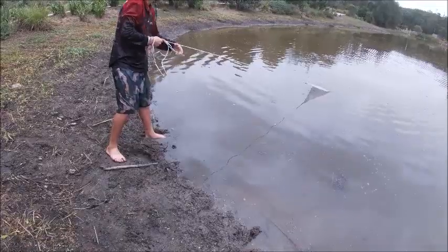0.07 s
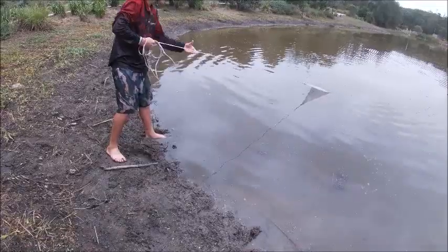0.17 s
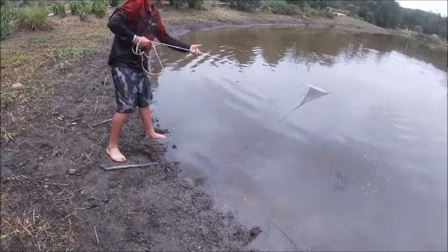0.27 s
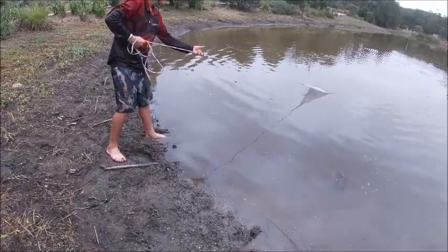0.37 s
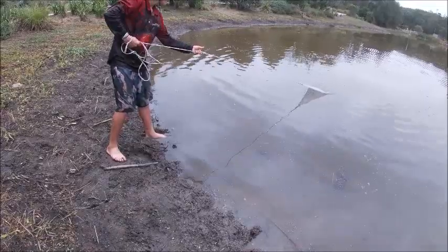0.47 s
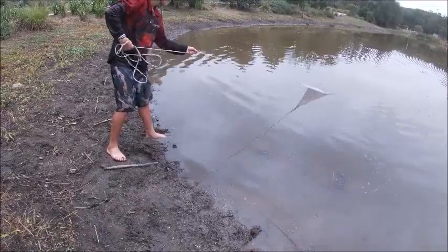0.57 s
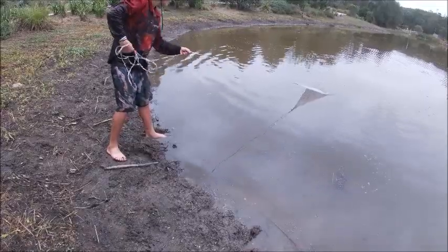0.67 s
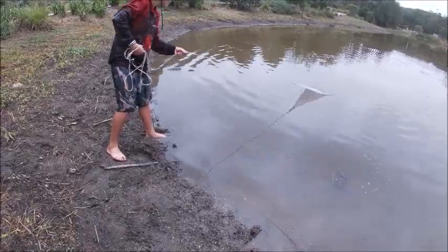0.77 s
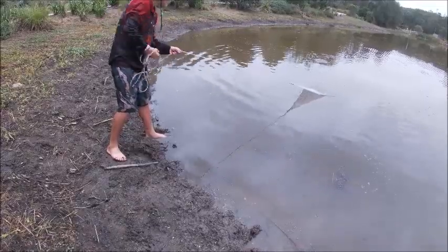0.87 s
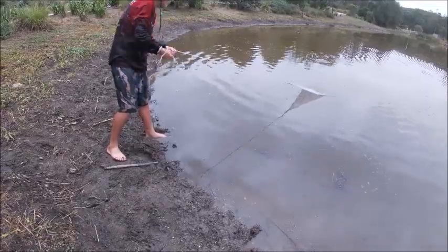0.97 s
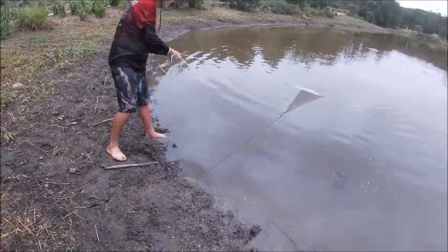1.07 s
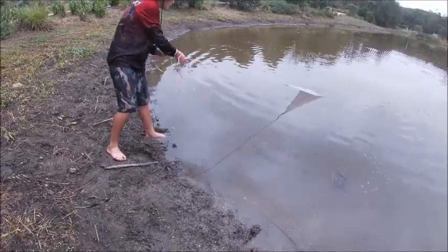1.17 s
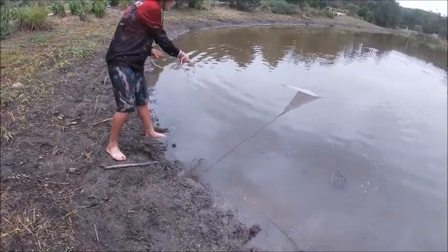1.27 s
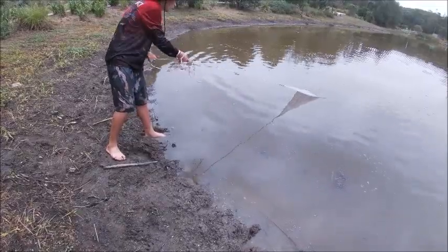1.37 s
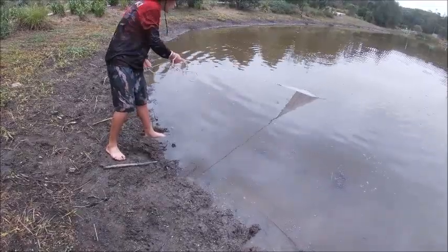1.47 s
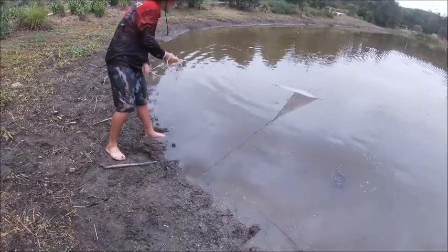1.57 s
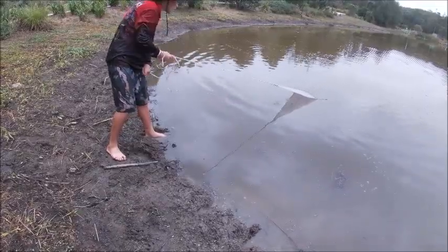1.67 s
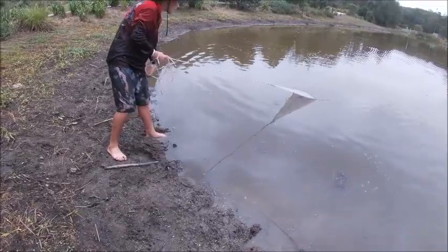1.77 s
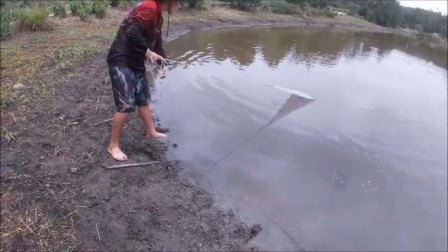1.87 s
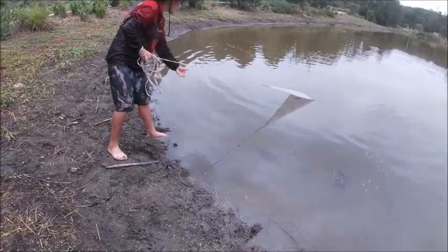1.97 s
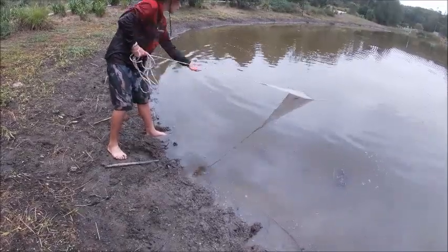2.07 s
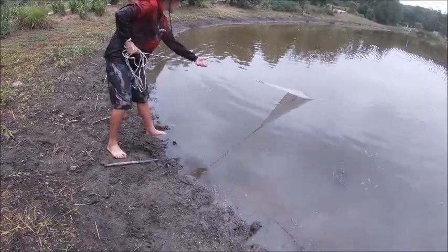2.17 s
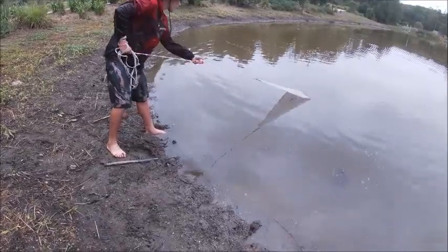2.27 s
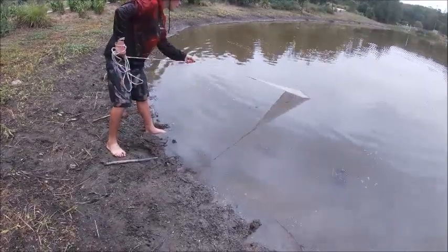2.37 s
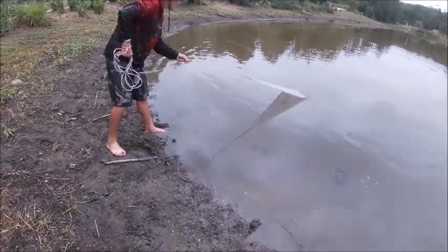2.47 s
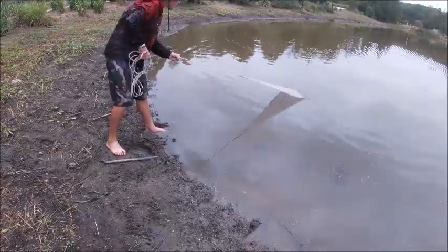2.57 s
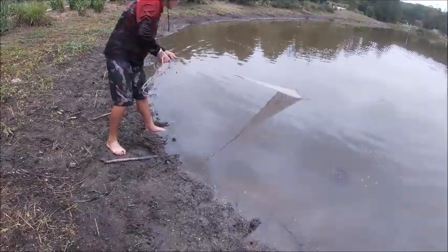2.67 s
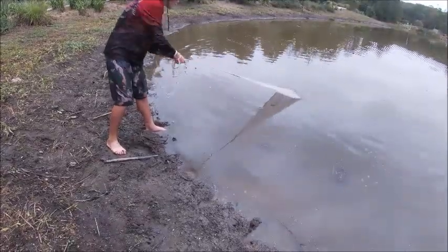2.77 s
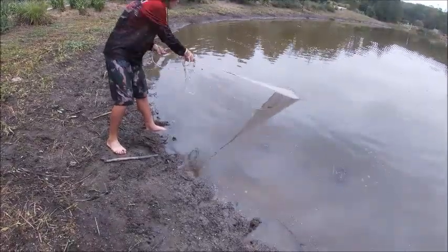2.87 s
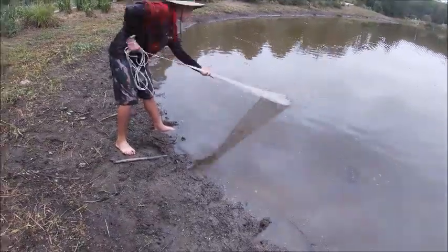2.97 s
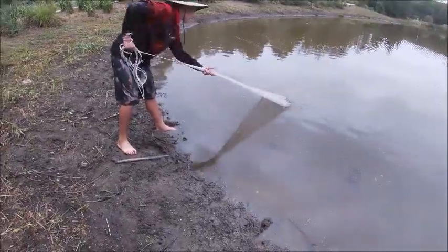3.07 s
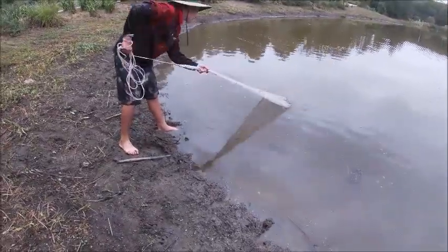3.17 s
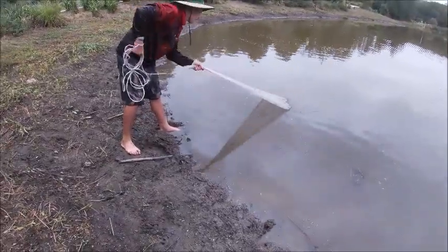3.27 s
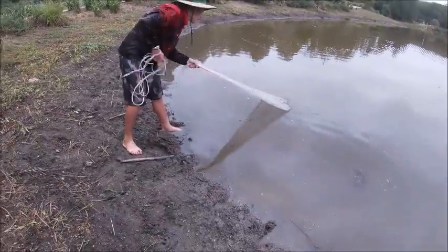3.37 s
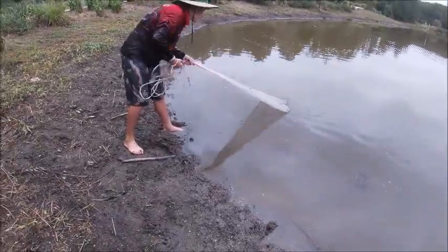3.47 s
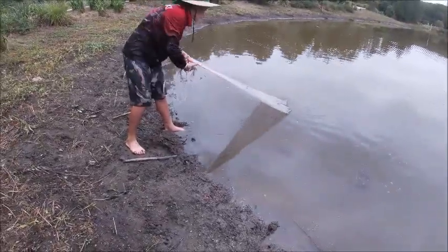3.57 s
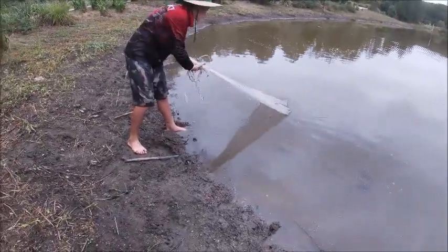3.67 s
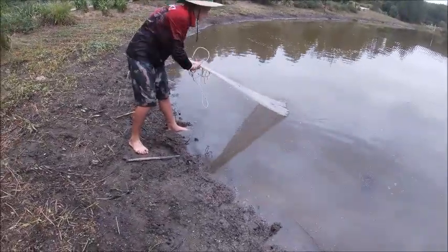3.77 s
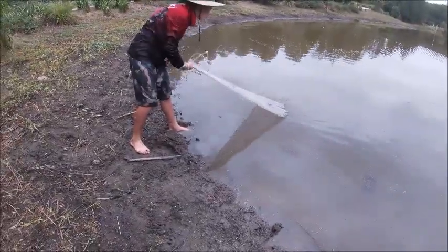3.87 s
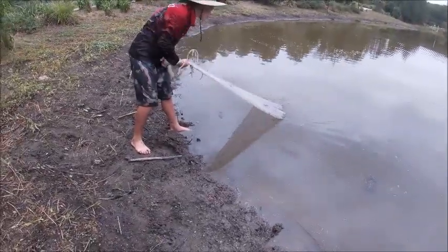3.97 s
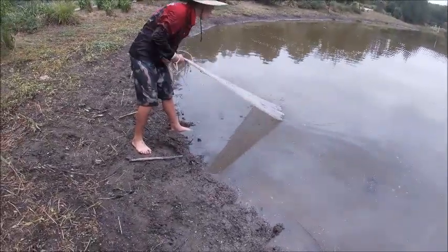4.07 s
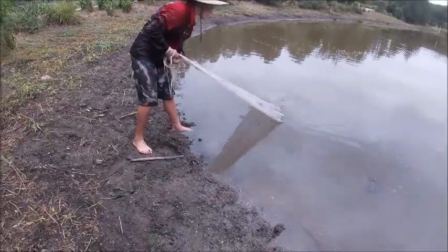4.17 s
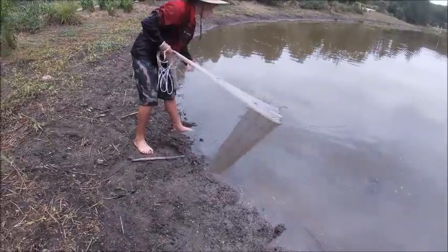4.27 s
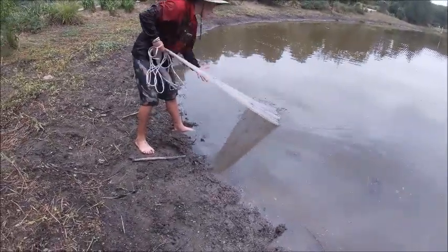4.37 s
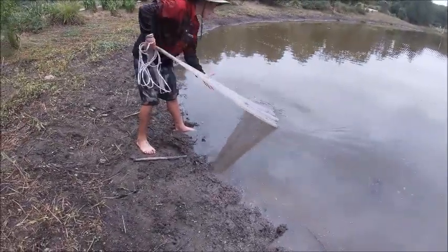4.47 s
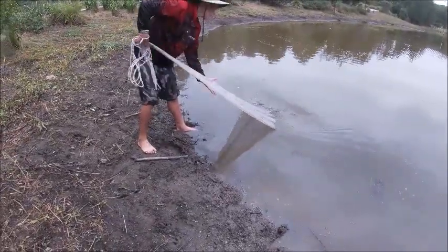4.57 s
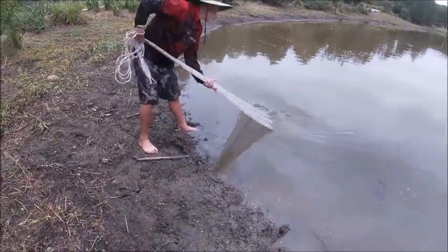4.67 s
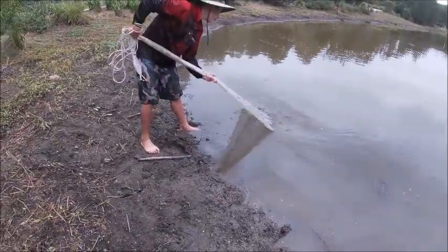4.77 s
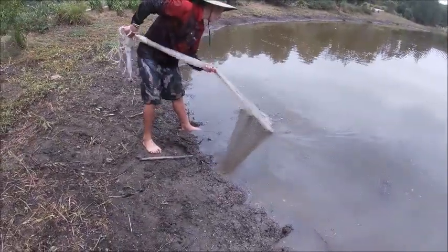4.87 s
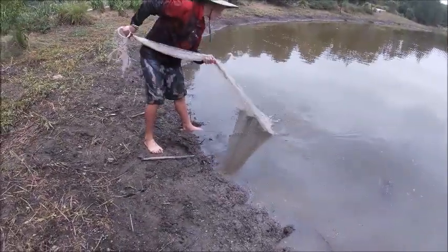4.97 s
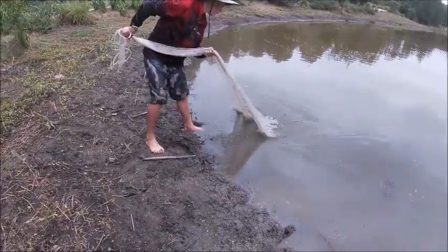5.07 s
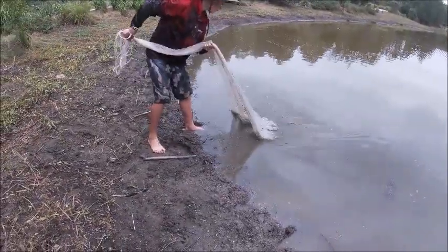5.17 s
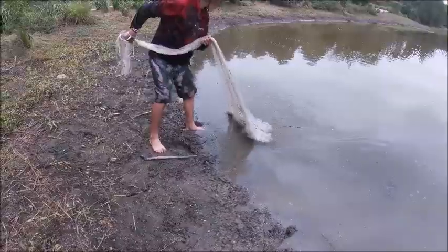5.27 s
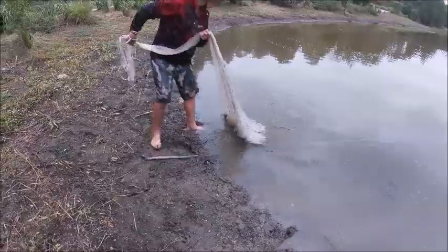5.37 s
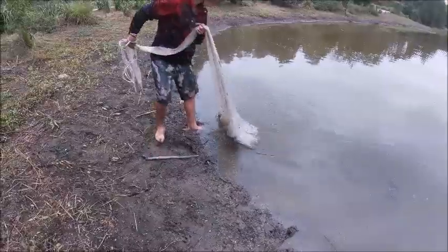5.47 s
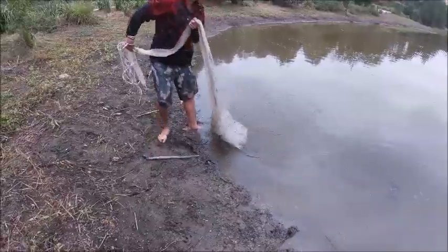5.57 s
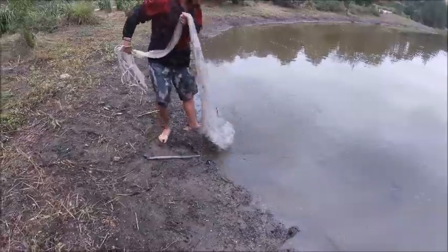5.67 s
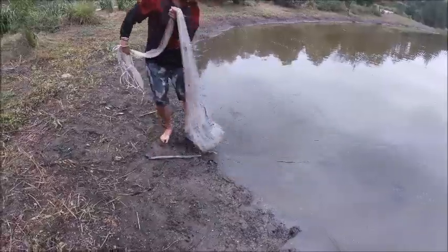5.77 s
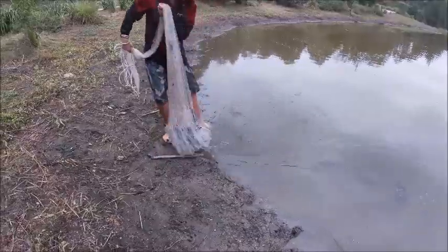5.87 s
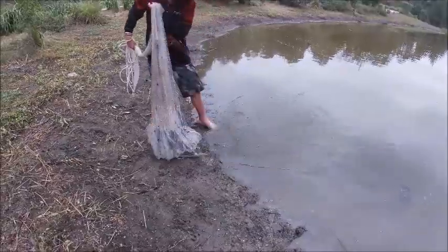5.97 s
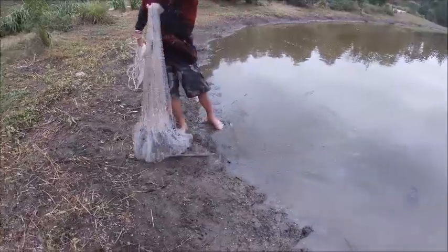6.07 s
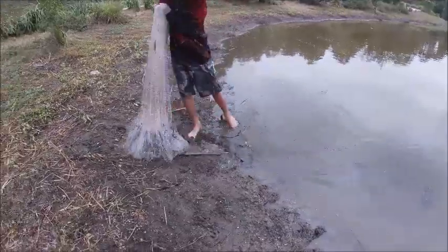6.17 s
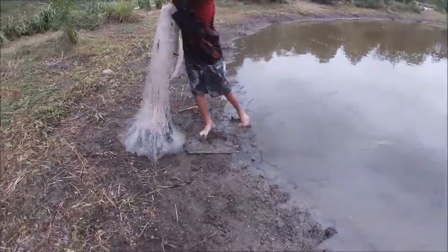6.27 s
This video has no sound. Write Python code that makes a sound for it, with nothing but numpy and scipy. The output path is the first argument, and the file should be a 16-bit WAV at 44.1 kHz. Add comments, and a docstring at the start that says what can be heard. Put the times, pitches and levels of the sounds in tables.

```python
"""A cast net is hauled in at a muddy pond, under a breeze that buffets the microphone and a far low hum that fades.
Wet rope rustles in clumps of friction grains while far birds twitter and whistle in gliding tones and an insect,
a pulsed narrow resonance, trills. Damped low knocks hit the mud, and a small bird chirps four times close by.
Bubbles gulp up with climbing pitch, fine drops hiss, and heavy drops smack and ring. At last the net lifts clear
and sheds its water in spurts, made of swarms of ringing bubbles and drop impacts."""
import sys
import numpy as np
from scipy import signal
from scipy.fft import rfft, irfft, next_fast_len
from scipy.io import wavfile
from scipy.ndimage import uniform_filter1d, map_coordinates

SR = 44100
rng = np.random.default_rng(int(sys.argv[2]) if len(sys.argv) > 2 else 0)


def write(x):
    x = np.atleast_2d(x).T
    wavfile.write(sys.argv[1], SR, np.round(np.clip(x, -1, 1) * 32767).astype(np.int16))

N = 278077


def amp(db):
    """Decibels to gain."""
    return 10 ** (np.asarray(db) / 20)


def unit(x):
    """Scale x to rms 1."""
    return x / np.sqrt(np.mean(x ** 2) + 1e-20)


def along(points, hz):
    """Read (Hz, value) points on a log frequency axis."""
    f, v = np.transpose(points)
    return np.interp(np.log(hz + 1), np.log(f + 1), v)


def curves(rows):
    """Draw one value per sample for each column after the time."""
    s, *columns = np.transpose(rows)
    t = np.arange(N) / SR
    return [np.interp(t, np.sort(s), column) for column in columns]


def wobble(rate):
    """A smooth random curve with rate knots a second."""
    knots = rng.standard_normal(int(N * rate / SR) + 4)
    fine = np.arange(len(knots) * 10) / 10
    smooth = map_coordinates(knots, [fine], mode="nearest")
    return np.interp(np.arange(N) * rate / SR, fine, smooth)


def filtered(x, response):
    """Multiply the spectrum of x by a response of frequency."""
    size = next_fast_len(N + SR // 2)
    hz = np.fft.rfftfreq(size, 1 / SR)
    return irfft(rfft(x, size) * response(hz), size)[:N]


def coloured(x, spectrum):
    """Shape x with a spectrum of (Hz, dB) points and bring it to rms 1."""
    return unit(filtered(x, lambda hz: amp(along(spectrum, hz))))


def noise(spectrum):
    """Noise of rms 1 with a spectrum."""
    return coloured(rng.standard_normal(N), spectrum)


def phase_of(hz):
    """Running phase of a pitch curve."""
    return 2 * np.pi * np.cumsum(hz) / SR


def add(track, s, sound):
    """Mix a sound into a track at s seconds."""
    part = track[max(round(s * SR), 0):][:len(sound)]
    part += sound[:len(part)]


def surges(rows):
    """Gain of overlapping surges that grow and fade exponentially, summed as powers."""
    t = np.arange(N) / SR
    power = 0
    for s, db, rise, fall in rows:
        distance = np.maximum((s - t) / rise, (t - s) / fall)
        power = power + (amp(db) * np.exp(-distance)) ** 2
    return np.sqrt(power)


def bubbles(count, low_hz, high_hz, cycles, spread_db, rise):
    """A steady swarm of bubbles; each rings some cycles while its pitch rises."""
    when, pitch, strength, life = rng.random((count, 4), dtype=np.float32).T[:, :, None]
    hz = low_hz * (high_hz / low_hz) ** pitch
    decay = cycles * (.5 + life) / hz
    index = np.arange(min(int(2 * cycles / low_hz * SR), SR // 40))
    t = index.astype(np.float32) / SR
    gain = amp(-spread_db * np.log(strength + .04)) * np.sqrt(hz / low_hz)
    envelope = (1 - np.exp(-t * hz)) * np.exp(-t / decay) * (1 - t / t[-1])
    bend = 1 + rise * np.tanh(t / decay / 2) / 2
    ring = gain * envelope * np.sin(2 * np.pi * hz * t * bend)
    position = (when * N).astype(int) + index
    return unit(np.bincount(position.ravel(), ring.ravel(), N)[:N])


def crackle(count, spread_db):
    """Scattered impulses, a few large among many small."""
    when, strength, sign = rng.random((count, 3)).T
    impulses = np.sign(sign - .5) * amp(-spread_db * np.log(strength + 0.037))
    return np.bincount((when * N).astype(int), impulses, N)


def banks(x, early_db, tail_db):
    """The ground answers within milliseconds; banks and trees add a thin long tail."""
    # Decay of the tail. Each row: frequency in Hz, t60 in seconds.
    tail_decay = [(300, 1), (3500, 0.63), (6000, 0.81), (10000, 0.53)]
    hz, t, z = signal.stft(rng.standard_normal(SR), SR, nperseg=256)
    fading = amp(-60 * t / along(tail_decay, hz)[:, None])
    tail = signal.istft(z * fading, SR, nperseg=256)[1]
    t = np.arange(len(tail)) / SR
    early = rng.standard_normal(len(t)) * amp(-60 * t / 0.12) * (t > .003)
    echo = amp(early_db) * early / np.linalg.norm(early)
    echo = echo + amp(tail_db) * tail / np.linalg.norm(tail)
    return x + signal.fftconvolve(x, echo)[:len(x)]


def breeze(air_db=-67.5):
    """Outdoor hush, a low rumble and slow wind buffets on the microphone, each as shaped noise."""
    # Colours of hush, wind and rumble. Each row: frequency in Hz, relative level in dB.
    air_colour = [(25, 5.5), (50, 0), (113, -10), (188, -3.5), (300, -10), (470, -21.5), (800, -12),
                  (1150, -17.5), (2840, -21), (3900, -26.5), (6800, -23.5), (9500, -38.5), (13200, -46.5),
                  (15500, -53)]
    buffet_colour = [(6, -8), (12, 8.5), (24, -7), (36, -5), (50, -14), (80, -33), (150, -52), (400, -51),
                     (1000, -110)]
    rumble_colour = [(50, -22.5), (85, -12), (118, -14.5), (160, 1.5), (205, -4), (270, -24.5), (450, -28),
                     (1000, -83)]
    # Wind gusts and rumble swells. Each row: peak in seconds, level in dB, rise and fall in seconds.
    gusts = [(2.02, -55, 0.032, 0.073), (3.27, -52.5, 0.087, 0.17), (4.6, -55.5, 0.071, 0.13),
             (4.78, -50.5, .02, .03), (4.9, -41, 0.046, 0.039), (5.22, -47.5, 0.12, 0.14),
             (5.7, -33.5, 0.064, 0.12), (6.31, -38.5, 0.14, 0.11)]
    swells = [(.03, -65.5, 0.033, 0.043), (1.2, -53.5, .02, 0.033), (1.35, -57.5, .04, 0.049),
              (1.72, -57.5, 0.027, 0.034), (2.3, -69, .3, .1), (4.57, -67.5, 0.069, 0.068),
              (6.05, -67, 0.4, 0.28)]
    calm_db, rumble_db, rumble_fade_db_per_s = -75.5, -69, 2.5  # floors between gusts and swells
    dip_s, dip_half_s, dip_db = 3.06, 0.02, -10  # the hush dips briefly
    t = np.arange(N) / SR
    dip = dip_db * np.exp(-((t - dip_s) / dip_half_s) ** 4)
    hush = amp(air_db + dip + 1.53 * wobble(4.405)) * noise(air_colour)
    buffets = np.hypot(amp(calm_db), surges(gusts)) * noise(buffet_colour)
    rumble_floor = amp(rumble_db - rumble_fade_db_per_s * t)
    rumble = np.hypot(rumble_floor, surges(swells)) * noise(rumble_colour)
    return hush + buffets + rumble


def hum(hum_hz=85, width_hz=7):
    """A faint low hum, noise through a narrow resonance, wavers and dies away."""
    # Each row: time in seconds, level in dB.
    hum_level = [(0, -69), (.85, -65.5), (1.0, -78), (1.6, -70.5), (2.2, -89)]
    tone = filtered(rng.standard_normal(N), lambda hz: 1 / (1 + ((hz - hum_hz) / width_hz) ** 2))
    return amp(curves(hum_level)[0]) * unit(tone)


def rope():
    """Each pull is a clump of friction grains, dull from the coils and hissing from the wet line."""
    # Wet rope drawn through the hands. Each row: loudest moment in seconds, level in dB,
    # spread of the bell-shaped swell in seconds, hiss share of the power (0-1).
    rustles = [(0.029, -58, 0.004, 0), (0.57, -73.5, 0.14, 0.7), (.868, -60, 0.0034, 0.17),
               (1.644, -60.5, 0.011, 0), (1.716, -59, 0.033, 0.14), (2.027, -51.5, 0.012, 0.06),
               (2.301, -63, .013, 0.16), (2.44, -68, 0.061, 0.96), (2.646, -65.5, .029, 0.98),
               (2.976, -68, 0.038, 0.42), (3.457, -66.5, 0.067, 0.98)]
    # Colours of the dull and hissing grains. Each row: frequency in Hz, relative level in dB.
    dull_colour = [(100, 11), (220, 8), (450, -9), (1050, 5.5), (1700, -2.5), (3000, -12), (6500, -16.5),
                   (10000, -44), (15000, -65)]
    hiss_colour = [(500, -29), (1500, -3), (3000, 0.5), (6500, -1), (8000, -7), (10000, -19.5),
                   (15000, -42)]
    t = np.arange(N) / SR
    dull = coloured(crackle(count=14000, spread_db=1), dull_colour)
    hiss = coloured(crackle(count=25000, spread_db=3.5), hiss_colour)
    pulls = np.zeros(N)
    for s, db, spread, share in rustles:
        share = np.clip(share, 0, 1)
        on = np.abs(t - s) < 4 * spread
        swell = np.exp(-.5 * ((t[on] - s) / spread) ** 2)
        grains = np.sqrt(1 - share) * dull[on] + np.sqrt(share) * hiss[on]
        pulls[on] += amp(db) * swell * grains
    return pulls


def smacks(hits):
    """Short wet smacks at (s, dB): decaying noise bursts, dull above the middle treble."""
    # Each row: frequency in Hz, gain in dB.
    smack_colour = [(300, -32), (1200, 5.5), (3500, 4.5), (7500, 2), (10000, -12.5), (12000, -26),
                    (15000, -26)]
    smack_t60_s = 0.025
    level, t = np.zeros(N), np.arange(SR // 8) / SR
    for s, db in hits:
        add(level, s, amp(db - 60 * t / smack_t60_s))
    return filtered(level * rng.standard_normal(N), lambda hz: amp(along(smack_colour, hz)))


def heavy_drops():
    """Each drop smacks the surface and traps a bubble; the lower its note, the longer it rings."""
    # Each row: start in seconds, smack level in dB before its colour, bubble pitch in Hz, bubble level in dB.
    drop_rows = [(.102, -63.5, 3420, -53), (.177, -74, 3100, -58.5), (4.503, -51.5, 1220, -43),
                 (5.115, -54, 1630, -42.5), (5.188, -59, 2690, -44.5), (5.461, -40, 2230, -36.5),
                 (5.552, -48, 1180, -55), (5.64, -51, 1960, -40), (5.645, -58, 1185, -40.5),
                 (5.731, -58, 1330, -41.5), (5.765, -57, 1700, -42), (5.888, -46.5, 2570, -40),
                 (5.907, -58, 1350, -40.5), (5.949, -45, 1400, -40.5), (6.004, -50, 760, -40),
                 (6.04, -47, 3500, -30.5), (6.064, -46, 820, -44), (6.093, -39.5, 1310, -36),
                 (6.162, -48, 825, -46.5), (6.244, -44.5, 986, -44.5)]
    ring_cycles, ring_rise = 43.3, 0.21  # cycles to fall 60 dB, share by which the pitch rises meanwhile
    pond, t = np.zeros(N), np.arange(SR // 8) / SR
    for s, _, hz, db in drop_rows:
        age = np.minimum(t * hz / ring_cycles, 2)
        envelope = amp(db - 60 * age) * (1 - np.exp(-2 * t * hz))
        add(pond, s, envelope * np.sin(phase_of(hz * (1 + ring_rise * age))))
    return pond + smacks([(s, db) for s, db, _, _ in drop_rows])


def twitters(flutter_db=4.5):
    """Runs of tiny swept notes, each a little different, with a fast flutter in level."""
    # Far birds' runs. Each row: first and last moment in seconds, notes a second, note length in seconds,
    # middle pitch in Hz, sweep in octaves, random variety in octaves, typical level in dB before flutter.
    runs = [(0.272, .72, 9.7, 0.05, 2756, -.36, 0.027, -84),
            (.712, 1.2, 11.5, .05, 2790, -.42, 0.027, -73.5),
            (1.598, 1.77, 70, .022, 5500, 0.105, 0.28, -72.5),
            (1.823, 1.96, 9.8, .044, 2515, -0.29, 0.022, -75),
            (2.755, 3.05, 24, .05, 2784, -0.16, 0.078, -75.5)]
    song = np.zeros(N)
    for first, last, rate, length, hz, sweep, variety, db in runs:
        u = np.linspace(0, 1, int(length * SR))
        starts = np.arange(first, last, 1 / rate)
        for s, (pitch, bend, size) in zip(starts, rng.standard_normal((40, 3))):
            octaves = variety * pitch + (sweep + variety * bend) * (u - .5)
            swell = np.sqrt(2) * np.sin(np.pi * u)
            add(song, s, amp(db + 2 * size) * swell * np.sin(phase_of(hz * 2 ** octaves)))
    return song * amp(flutter_db * (wobble(180) - .5))


def insect(carrier_hz=6500, width_hz=170, pulse_hz=67.8):
    """A narrow resonance stroked by fast wing beats, in one long trill."""
    # Each row: time in seconds, level in dB; the first and last rows bound the trill.
    trill = [(.72, -86), (1.0, -82.5), (1.5, -80), (2.15, -78.5), (2.42, -78)]
    t = np.arange(N) / SR
    singing = np.clip(np.minimum(t - trill[0][0], trill[-1][0] - t) * 20, 0, 1)
    resonance = filtered(rng.standard_normal(N), lambda hz: 1 / (1 + ((hz - carrier_hz) / width_hz) ** 4))
    strokes = (1 + np.sin(phase_of(pulse_hz * (1 + .012 * wobble(3.3))))) ** 2
    return singing * amp(curves(trill)[0]) * unit(unit(resonance) * strokes)


def far_birds(waver_db=-1.0):
    """Soft gliding whistles and short high slurs, each a swelling sine."""
    # Long whistles. Each row: start and length in seconds, start and end pitch in Hz, nominal level in dB.
    whistles = [(.91, 0.29, 1268, 1128, -70), (1.13, .25, 1900, 1603, -79), (1.167, .21, 1567, 1300, -75.5),
                (1.339, .29, 1385, 1126, -68.5), (1.711, .082, 1287, 1353, -70.5),
                (1.843, .23, 1040, 917, -72), (2.26, 0.15, 1576, 1418, -76), (2.833, 0.13, 1306, 1295, -77),
                (3.243, .14, 4830, 4720, -79.5), (3.266, .082, 3550, 3550, -77),
                (3.932, .15, 1457, 1376, -80), (4.06, .1, 4600, 4820, -68), (4.141, 0.16, 1560, 1568, -79)]
    # Thin high slurs. Each row: start in seconds, start and end pitch in Hz, nominal level in dB.
    slurs = [(.94, 6230, 5380, -77.5), (1.26, 6550, 6880, -74.5), (1.338, 6900, 5180, -77),
             (1.61, 4860, 3830, -77), (1.662, 3600, 7000, -68), (1.708, 5990, 5480, -66.5),
             (1.64, 8060, 7650, -74.5), (2.052, 5900, 4550, -77), (2.465, 6480, 4920, -67.5),
             (2.5, 5300, 6670, -73.5)]
    slur_s = .045  # length of every slur
    song = np.zeros(N)
    for s, length, start_hz, end_hz, db in list(whistles) + [(s, slur_s, *rest) for s, *rest in slurs]:
        u = np.linspace(0, 1, int(length * SR))
        swell = 1.52 * np.abs(np.sin(np.pi * u)) ** 0.63
        glide_hz = start_hz * (end_hz / start_hz) ** u
        add(song, s, amp(db) * swell * np.sin(phase_of(glide_hz)))
    return song * amp(waver_db * wobble(25.04))


def dribble(fizz_db=-1.5, tick_db=-8, flutter_db=2.84):
    """A soft hiss of fine drops from the wet line and mesh, with tiny bubbles and a few high ticks in it."""
    # Each row: time in seconds, level in dB before flutter.
    dribble_level = [(3.05, -84), (3.25, -69), (3.7, -72), (4.1, -71.5), (4.75, -64), (5.0, -68.5),
                     (5.5, -62.5), (6.3, -56)]
    # Each row: frequency in Hz, relative level in dB.
    drizzle_colour = [(500, -41), (1400, -5), (2200, 1.5), (3200, 3.5), (4200, -4.5), (5500, -1),
                      (7000, -3.5), (8200, -12), (10000, -16), (15000, -40)]
    fizz = bubbles(count=1500, low_hz=1900, high_hz=9000, cycles=10, spread_db=4.3, rise=.1)
    ticks = bubbles(count=250, low_hz=5000, high_hz=11000, cycles=3, spread_db=5.5, rise=.1)
    drizzle = noise(drizzle_colour)
    drizzle = drizzle + amp(fizz_db) * coloured(fizz, drizzle_colour)
    drizzle = drizzle + amp(tick_db) * coloured(ticks, drizzle_colour)
    return amp(curves(dribble_level)[0] + flutter_db * wobble(12)) * unit(drizzle)


def thuds():
    """Mud gives a damped low note over a deep push, a short squelch and a wet smack."""
    # Soft knocks. Each row: start in seconds, note in Hz, note level in dB, t60 in seconds,
    # squelch level and wet smack level in dB relative to the note.
    knock_rows = [(3.213, 305, -47.5, 0.037, -1.5, -8.5), (3.272, 182, -57.5, 0.075, 1, -15),
                  (4.768, 190, -40, .071, -10, -8.5)]
    deep_hz, deep_db, deep_t60_s = 73, -3, 0.079  # the ground's push, relative to the note
    knocks, t = np.zeros(N), np.arange(SR // 4) / SR
    squelch = noise([(100, 5.5), (400, 6.5), (750, 4), (1300, -6.5), (5000, -54)])
    attack = 1 - np.exp(-t / .0008)
    push = amp(deep_db - 60 * t / deep_t60_s) * np.sin(2 * np.pi * deep_hz * t)
    for s, hz, db, t60, squelch_db, _ in knock_rows:
        puff = amp(squelch_db - 60 * t / 0.031) * squelch[round(s * SR):][:len(t)]
        note = amp(-60 * t / t60) * np.sin(2 * np.pi * hz * t)
        add(knocks, s, amp(db) * attack * (note + push + puff))
    return knocks + smacks([(s, db + smack_db) for s, _, db, _, _, smack_db in knock_rows])


def chirp(opening_pitch, tilt, opening_length, flip_pitch, trough_pitch, swing_length, swing_db,
          swing_octave_db, rasp, waver, rasp_db=-8):
    """One chirp opens on a strong octave, then flips up and swings down in a purer, slightly raspy tone."""
    # The shape all chirps share. Each row: seconds from the top of the flip, pitch in Hz,
    # level in dB and octave overtone in dB, all before the manner of the single chirp.
    shape = [(-.032, 3010, -60.5, 9), (-.021, 2682, -56.5, 13), (-.008, 2864, -57, 15),
             (-.003, 4404, -44, -9.5), (0, 5070, -38, -32), (.003, 4500, -39, -24), (.007, 3503, -42, -9),
             (0.011, 2886, -51.5, 0.5), (.018, 3636, -42, -29), (.022, 3958, -39.5, -19.5),
             (.035, 3500, -61, -23)]
    s, hz, db, octave_db = np.transpose(shape)
    # which points belong to each part
    opening, flip, trough, rebound = np.repeat(np.eye(4), [3, 3, 2, 3], axis=1)
    swing = trough + rebound
    tilted = opening_pitch * 2 ** (tilt * (s - np.average(s, weights=opening)))
    hz = hz * (opening * tilted + (flip + rebound) * flip_pitch + trough * trough_pitch)
    db, octave_db = db + swing * swing_db, octave_db + swing * swing_octave_db
    s = np.sort(s * (opening * opening_length + flip + swing * swing_length))
    t = np.arange(s[0], s[-1], 1 / SR)
    hz, db, octave_db = [np.interp(t, s, column) for column in (hz, db, octave_db)]
    hz = uniform_filter1d(hz, size=130)  # rounds the corners of the pitch curve
    gate = np.clip(np.minimum(t - t[0], t[-1] - t) / 0.0015, 0, 1)
    sweep = np.tanh(np.abs(np.gradient(hz)) * SR / 200000)  # the voice breaks up where its pitch moves fastest
    phase = phase_of(hz * waver[:len(t)])
    voice = amp(rasp_db) * sweep * rasp[:len(t)]
    for order, level in enumerate([0, octave_db, octave_db - 6, octave_db - 6], 1):
        beak = 1 / (1 + (order * hz / 7900) ** 16)  # high overtones radiate poorly
        voice = voice + amp(level) * beak * np.sin(order * phase)
    return t[0], np.sqrt(2) * gate * amp(db) * voice


def off_the_pond(x, delay=.0085, db=-12):
    """A single reflection from the water and shore, delay in seconds, muddles fast sweeps."""
    index = np.arange(len(x))
    return x + amp(db) * np.interp(index - delay * SR, index, x)


def near_bird(rough=0.014, flutter_db=2):
    """The bird moves between chirps, so each one finds its own echo."""
    # Each row: top of the flip in seconds, level offset in dB, opening pitch ratio, opening tilt in octaves
    # a second, opening length ratio, flip pitch ratio, trough pitch ratio, swing length ratio,
    # swing level offset in dB, swing octave overtone offset in dB.
    chirp_rows = [(3.4171, -1.5, .945, 13, .83, 1.024, 1, 1.1, 0.5, 3.5),
                  (3.856, .5, 1.0, -6, 1.05, 1, 0.99, 1.06, -1, 4.5),
                  (4.169, 1, .93, -2, 0.97, .93, .94, .97, 1, -0.5),
                  (4.566, 0, 1.055, -1.5, 1.03, 1.0, 0.94, 0.97, 2.5, -11)]
    song = np.zeros(N)
    waver = 1 + rough * wobble(700)
    flutter = amp(flutter_db * wobble(330) - 1.0)
    rasp = noise([(2000, -58), (3000, -6), (4500, 7), (6500, 1), (8000, -18), (10000, -46), (15000, -43)])
    for s, db, *manner in chirp_rows:
        at = round(s * SR)
        lead, call = chirp(*manner, rasp[at:], waver[at:])
        call = np.pad(call * flutter[at:][:len(call)], (0, SR))  # room for the echo
        add(song, s + lead, amp(db) * banks(off_the_pond(call), early_db=-12.5, tail_db=-11.0))
    return song


def gulps():
    """A bubble's pitch climbs ever faster as it nears the surface, where it bursts."""
    # Large bubbles in shallow water. Each row: start in seconds, starting pitch in Hz, level in dB,
    # t60 in seconds, time in which the pitch doubles in seconds.
    gulp_rows = [(3.759, 1007, -55.5, 0.25, .063), (4.346, 2020, -56, 0.047, .034),
                 (5.109, 614, -62.5, 0.64, .053)]
    pond, t = np.zeros(N), np.arange(SR // 6) / SR
    for s, hz, db, t60, doubling in gulp_rows:
        climb = np.minimum((t / doubling) ** 2.8, 2)
        alive = np.clip(2 * (2 - climb), 0, 1) * (1 - np.exp(-2 * t * hz))  # swells within one cycle
        add(pond, s, amp(db - 60 * t / t60) * alive * np.sin(phase_of(hz * (1 + climb))))
    return pond


def pouring(flutter_db=1.5, splatter_db=-5, impact_db=-5, level_db=-1):
    """Water streams out of the lifted mesh in spurts: ringing bubbles, short splatter and drop impacts."""
    # Spurts from the mesh, before trim and flutter, and big bubbles as the weighted hem leaves the water.
    # Each row: peak in seconds, level in dB, rise and fall in seconds.
    spurts = [(5.12, -69.5, .05, 0.28), (5.605, -48.5, 0.021, 0.013), (5.65, -50, 0.012, 0.14),
              (5.91, -50.5, 0.04, 0.015), (6.0, -45, 0.015, 0.079), (6.05, -44.5, 0.056, 0.11)]
    gurgle = [(6.03, -52.5, .035, 0.12)]
    # Each row: frequency in Hz, relative level in dB.
    water_colour = [(200, -9), (400, -9), (560, -14), (850, -2.5), (1500, -2), (2300, -1.5), (3200, 0.5),
                    (4200, -13), (5300, -3.5), (7400, -9), (9500, -20), (12000, -30), (15500, -29)]
    ringing = bubbles(count=2000, low_hz=620, high_hz=5500, cycles=9, spread_db=4.5, rise=.2)
    splatter = bubbles(count=4000, low_hz=900, high_hz=11000, cycles=4, spread_db=4.5, rise=.1)
    deep = bubbles(count=900, low_hz=480, high_hz=1000, cycles=5, spread_db=3.5, rise=.2)
    impacts = crackle(count=9000, spread_db=5)
    stream = coloured(ringing, water_colour)
    stream = stream + amp(splatter_db) * coloured(splatter, water_colour)
    stream = stream + amp(impact_db) * coloured(impacts, water_colour)
    flow = surges(spurts) * amp(level_db + flutter_db * wobble(45))
    return flow * unit(stream) + surges(gurgle) * deep


def scene():
    """Birds, hauling and weather at the pond's edge."""
    haul = rope() + thuds() + gulps() + heavy_drops() + pouring() + dribble()
    far = banks(far_birds() + twitters() + insect(), early_db=-10, tail_db=-5.5)
    near = banks(haul, early_db=-16.5, tail_db=-19.0) + near_bird()
    return (near + far + breeze() + hum())[None]


def record(dry):
    """A steep band limit removes the highest treble."""
    top_hz = 15200
    return filtered(dry[0], lambda hz: hz < top_hz)[None]


dry = scene()
out = record(dry)
write(out)
```